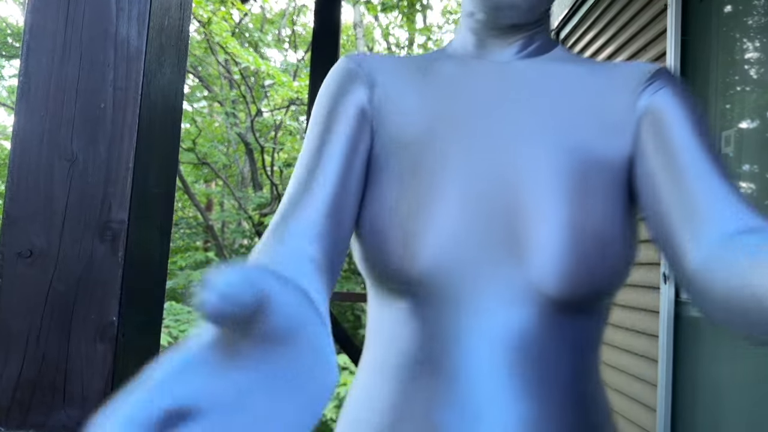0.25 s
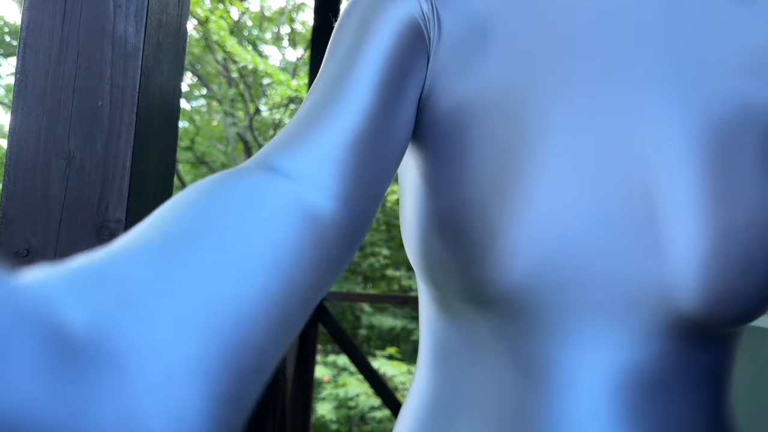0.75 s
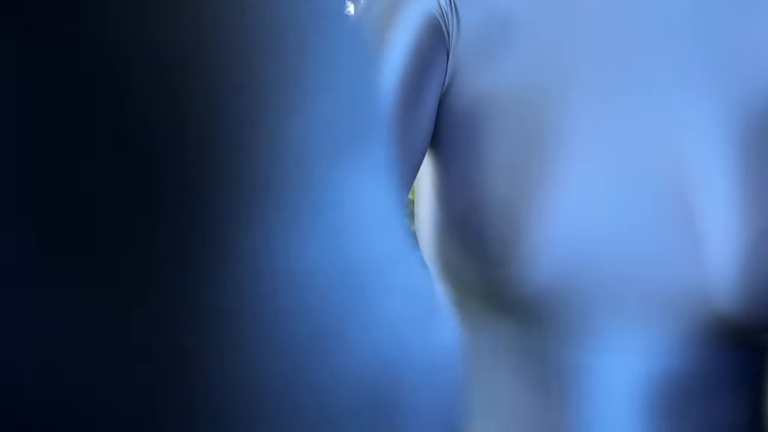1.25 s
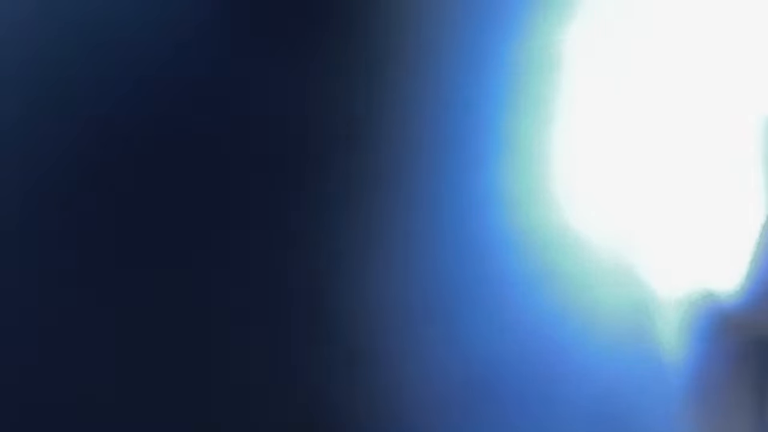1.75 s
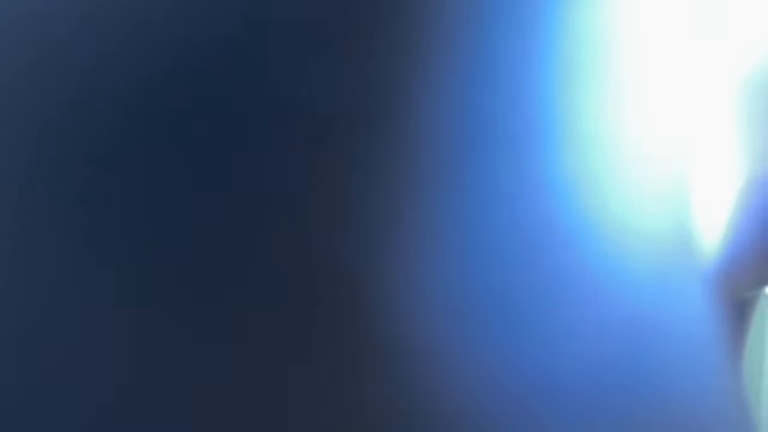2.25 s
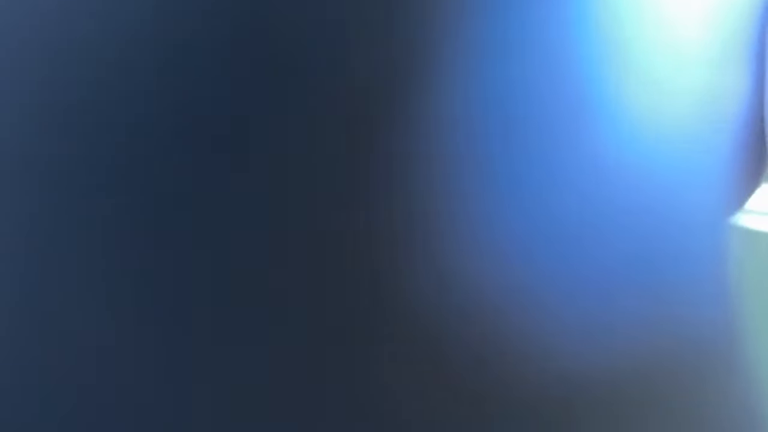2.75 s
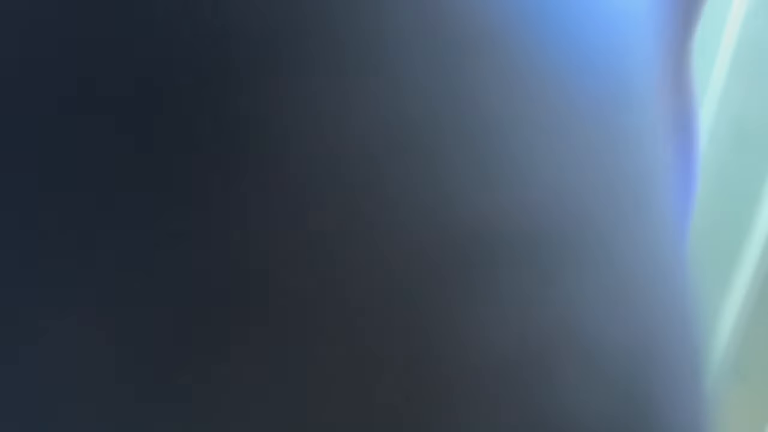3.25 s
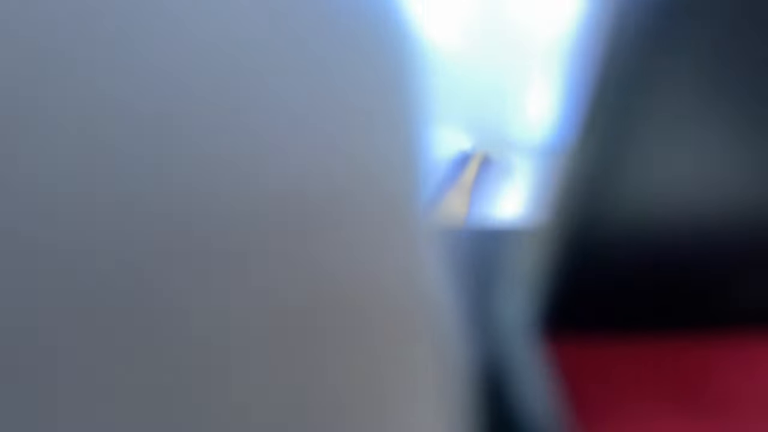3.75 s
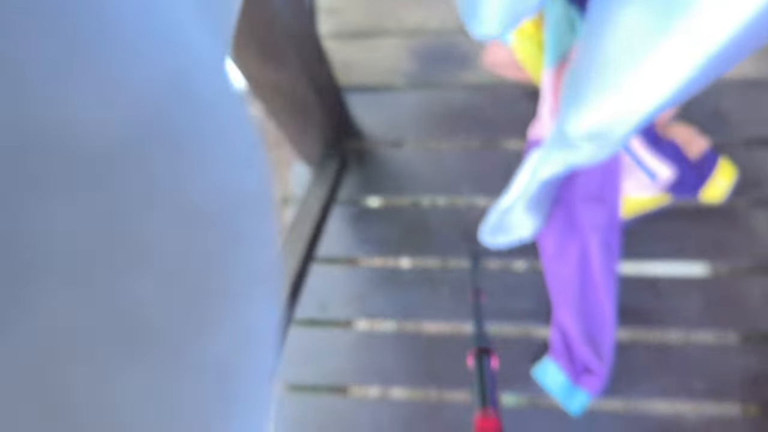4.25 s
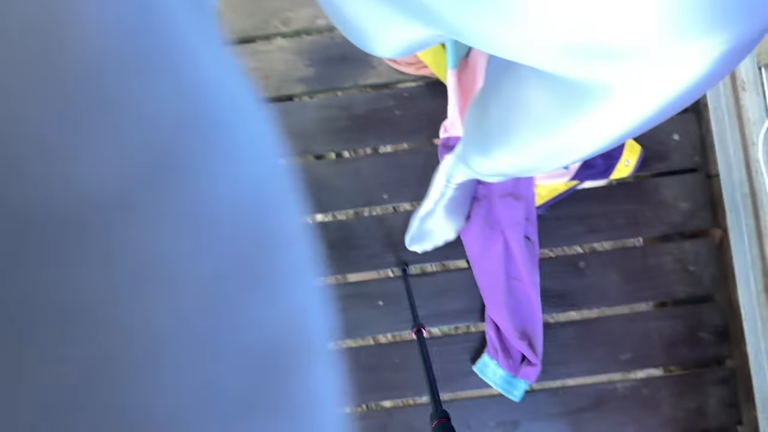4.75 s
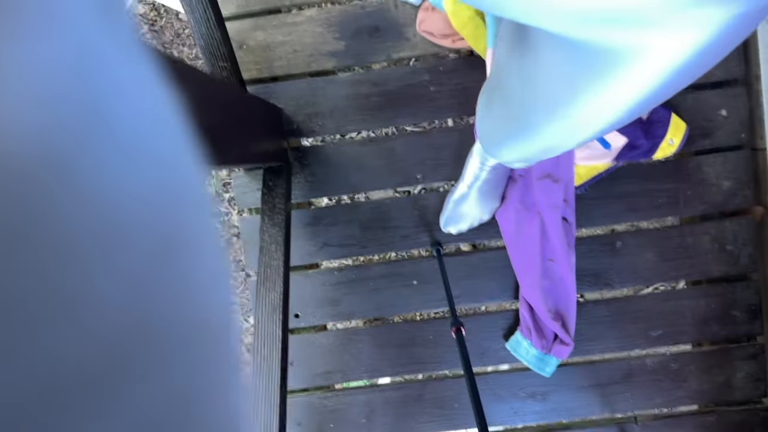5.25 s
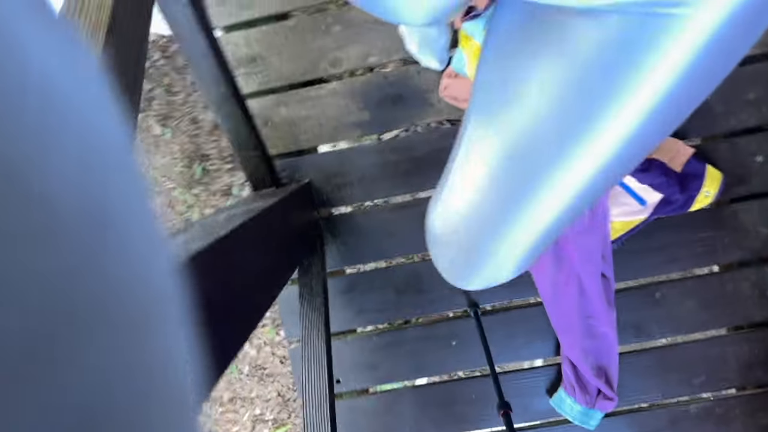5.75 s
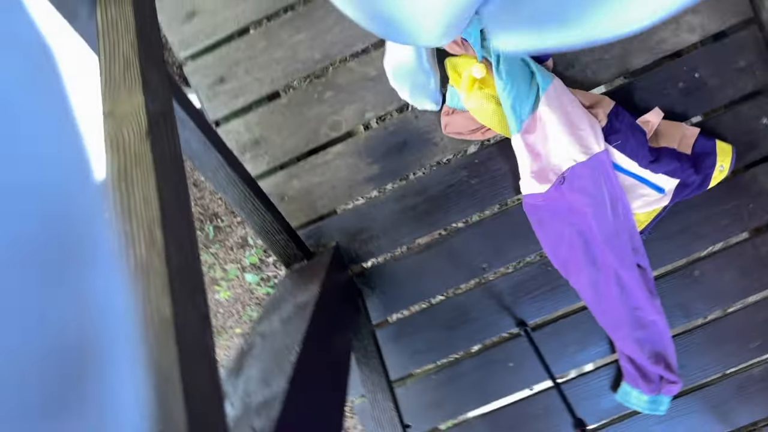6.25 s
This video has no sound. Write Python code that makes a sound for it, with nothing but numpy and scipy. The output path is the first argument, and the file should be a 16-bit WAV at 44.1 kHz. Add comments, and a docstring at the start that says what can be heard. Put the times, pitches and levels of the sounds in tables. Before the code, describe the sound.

A handled camera clicks, bumps and squeaks out of a plastic mount, with soft fabric swishes and faint, repeated rising bird whistles outdoors.

```python
"""A hand works a camera out of its plastic holder: the casing clicks and thumps, then scrapes and
squeaks free. Contacts and tiny slips ring its body, shell and edges; stick and slip makes the squeals.
Stretch-fabric sleeves swish near the microphone. Around the wooden forest balcony a bird repeats a
rising whistle among the trees and others pipe faintly, over a steady outdoor hiss."""
import sys
import numpy as np
from scipy import signal
from scipy.fft import rfft, irfft, next_fast_len
from scipy.io import wavfile
from scipy.ndimage import map_coordinates

SR = 44100
rng = np.random.default_rng(int(sys.argv[2]) if len(sys.argv) > 2 else 0)


def inscribe(sig):
    """Save sig as 16-bit PCM at rate SR to the path in sys.argv[1].

    A 1-D sig is mono; a 2-D sig holds one channel per row.
    Samples are clipped to [-1, 1] before scaling.
    """
    pcm = np.round(np.clip(np.atleast_2d(sig).T, -1, 1) * 32767)
    wavfile.write(sys.argv[1], SR, pcm.astype(np.int16))


N = 286650  # 6.5 s


def amp(db):
    """Decibels to gain."""
    return 10 ** (np.asarray(db) / 20)


def unit(x):
    """Scale to rms 1."""
    return x / np.sqrt(np.mean(x ** 2) + 1e-20)


def along(points, hz):
    """Read (Hz, value) points on a log frequency axis."""
    point_hz, values = np.transpose(points)
    return np.interp(np.log(hz + 1), np.log(point_hz + 1), values)


def curve(points):
    """An automation line through (seconds, value) points."""
    times, values = np.transpose(points)
    return np.interp(np.arange(N) / SR, times, values)


def clock(length):
    """Sample times over a length in seconds."""
    return np.arange(max(int(length * SR), 2)) / SR


def add(track, start, sound):
    """Mix a sound into a track at a start time in seconds."""
    part = track[max(round(start * SR), 0):][:len(sound)]
    part += sound[:len(part)]


def wobble(rate):
    """A smooth random curve, rate knots a second."""
    return map_coordinates(rng.standard_normal(int(N * rate / SR) + 4), [np.arange(N) * rate / SR])


def gate(start, end, edge):
    """Open between start and end, with soft fades of edge seconds."""
    t = np.arange(N) / SR
    inside_s = np.minimum(t - start, end - t)
    return np.sin(np.pi / 2 * np.clip(inside_s / edge + .5, 0, 1)) ** 2


def swell(start, end, steep, build_db=0):
    """A stroke gathers speed and slows again: an arch that may lean towards its end."""
    from_middle = np.arange(N) / SR - (start + end) / 2
    position = np.clip(from_middle / max(end - start, .002), -5, 5)
    return np.exp(-np.abs(2 * position) ** steep) * amp(build_db * position)


def strokes(rows, steep):
    """Joint envelope of (start, end, dB) strokes, summed in power."""
    return np.sqrt(sum((amp(db) * swell(start, end, steep)) ** 2 for start, end, db in rows))


def filtered(x, response):
    """Filter x by a complex response of frequency."""
    size = next_fast_len(len(x) + 8192)
    return irfft(rfft(x, size) * response(np.fft.rfftfreq(size, 1 / SR)), size)[:len(x)]


def resonate(x, modes):
    """Ring a bank of (Hz, width, dB) resonances of alternating polarity."""
    def response(f):
        return sum((-1) ** k * amp(db) * 1j * f * width / (hz * hz - f * f + 1j * f * width)
                   for k, (hz, width, db) in enumerate(modes))
    return filtered(x, response)


def noise(spectrum):
    """Noise of rms 1, coloured by (Hz, dB) points."""
    return unit(filtered(rng.standard_normal(N), lambda hz: amp(along(spectrum, hz))))


def tone(hz):
    """A sine of rms 1 that follows a pitch curve."""
    return np.sqrt(2) * np.sin(2 * np.pi * np.cumsum(hz) / SR)


# Colour of the outdoor bed. Each row: frequency in Hz, relative level in dB.
AIR_COLOUR = [(15, -61), (25, -36), (45, 0.5), (70, -2), (170, -8), (206, -3.5), (242, -7.5), (516, -8.5),
              (560, -8.5), (1330, -9), (2000, -16.5), (2160, -11.5), (3340, -21), (5280, -27),
              (16000, -43.5)]
# The bed's fader, in an early and a late list. Each row: time in seconds, level in dB.
AIR_FADER = [
    [(0.0, -58), (1.88, -57), (2.6, -57)],
    [(3.9, -58), (4.37, -58.5), (6.5, -56.5)],
]
# Two humps in the hiss. Each row: centre in Hz, width in Hz, gain in dB.
AIR_HUMPS = [(1130, 310, -3.5), (2050, 330, -2.5)]
# The hollow under the hand. Each row: centre in Hz, width in Hz, gain in dB.
CUP_MODES = [(1300, 240, -1.5), (2180, 140, -3)]


def air(cup_db=-5):
    """The forest hush wavers slightly, and turns hollow while the hand is cupped over the camera."""
    level = amp(curve(np.vstack(AIR_FADER)) + 0.6 * wobble(6.7))
    humps = unit(resonate(rng.standard_normal(N), AIR_HUMPS))
    cupped = gate(1.09, 3.88, edge=0.39) * unit(resonate(rng.standard_normal(N), CUP_MODES))
    hiss = amp(0.57) * noise(AIR_COLOUR)
    return level * (hiss + amp(-6.5 + wobble(1.1)) * humps + amp(cup_db) * cupped)


# The forest's reverb tail. Each row: frequency in Hz, seconds to fade by 60 dB.
FOREST_DECAY = [(1000, 0.67), (4000, 1), (10000, 0.89)]


def forest(x, direct_db, wet_db, near_db, near_t60=.16):
    """Near trunks and walls blur a sound at once; farther trees add a diffuse tail."""
    hz, t, spectrum = signal.stft(rng.standard_normal(SR), SR, nperseg=256)
    far = amp(-60 * t / along(FOREST_DECAY, hz)[:, None])
    near = amp(near_db - 60 * t / near_t60)
    tail = signal.istft(spectrum * (far + near), SR, nperseg=256)[1]
    wet = signal.fftconvolve(x, tail / np.linalg.norm(tail))[:N]
    return amp(direct_db) * x + amp(wet_db) * wet


# Sheen of the birds' octave. Each row: the octave's frequency in Hz, relative level in dB.
OCTAVE_COLOUR = [(6500, -15), (7800, -7.5), (9000, -29), (10500, -26.5)]


def chirp(hz, waver, overtone_db):
    """A slightly unsteady whistle with a weak octave."""
    hz = hz * (1 + waver * wobble(220)[:len(hz)])
    return tone(hz) + amp(overtone_db + along(OCTAVE_COLOUR, 2 * hz)) * tone(2 * hz)


# A second bird's short pipes. Each row: start in seconds, relative level in dB, top pitch in Hz.
PIPE_NOTES = [(.05, -63, 2900), (.383, -55, 3494), (.94, -61, 3520), (3.9, -65, 2950), (4.18, -67.5, 3480),
              (4.76, -63, 3430)]


def piping_bird():
    """Short, clean pipes that arch in pitch and level."""
    out, t = np.zeros(N), clock(0.05)
    progress = t / t[-1]
    arch = np.sin(np.pi * progress)
    bend = 1 - 0.15 * (progress - .75) ** 2
    for start, db, top_hz in PIPE_NOTES:
        add(out, start, amp(db) * arch * chirp(top_hz * bend, waver=0.012, overtone_db=-9))
    return out


def thin_bird(start=4.155, end=4.52, first_hz=13000, last_hz=9000, db=-78, fade_db=10):
    """One very thin whistle that falls ever faster and fades."""
    out = np.zeros(N)
    progress = clock(end - start) / (end - start)
    glide_hz = first_hz + (last_hz - first_hz) * progress ** 1.3
    waver = (1 + .015 * wobble(30) + .006 * wobble(150))[:len(progress)]
    envelope = amp(db - fade_db * progress) * signal.windows.tukey(len(progress), .1)
    add(out, start, envelope * tone(glide_hz * waver))
    return out


# The near bird's whistles. Each row: start in seconds, relative level in dB, top pitch in Hz.
RISING_CALLS = [(1.271, -63.5, 5430), (1.565, -67, 5260), (1.843, -66, 5420), (2.145, -64.5, 5270),
                (2.43, -63, 5370), (4.982, -57.5, 4830), (5.272, -56.5, 5380), (5.532, -56.5, 5370),
                (5.825, -56, 5420), (6.081, -54.5, 5400), (6.38, -53, 5430)]


def near_bird(rise_hz=1123, rise_s=.07, hook_hz=1403, hook_s=.028, attack_s=0.0094, hook_fade_db=12):
    """Each call swells in and slides upward, then hooks quickly down as it fades."""
    out, t = np.zeros(N), clock(rise_s + hook_s)
    climb = np.minimum(t / rise_s, 1)
    hook = np.maximum(t - rise_s, 0) / hook_s
    under_top_hz = rise_hz * (1 - climb) + hook_hz * hook ** 1.3
    envelope = (1 - np.exp(-t / attack_s)) * amp(-hook_fade_db * hook)
    for start, db, top_hz in RISING_CALLS:
        add(out, start, amp(db) * envelope * chirp(top_hz - under_top_hz, waver=.009, overtone_db=1))
    return out


# Sleeve moves. Each row: start and end in seconds, relative level in dB.
SLEEVE_SWISHES = [(0, 0.213, -70), (0.526, 0.67, -62), (0.863, 1.093, -69), (1.117, 1.36, -63),
                  (1.355, 1.56, -67.5), (3.582, 3.719, -66), (3.93, 3.984, -68.5), (4.08, 4.14, -66),
                  (4.199, 4.56, -73.5), (4.57, 4.836, -68.5), (5.517, 5.609, -64.5), (5.92, 6.054, -62.5),
                  (6.05, 6.4, -72)]
# Colour of the cloth. Each row: frequency in Hz, relative level in dB.
FABRIC_COLOUR = [(1500, -13.5), (4000, 4), (6500, 2), (10000, -0.5), (14000, 2), (16000, -3.5)]


def sleeves():
    """Smooth fabric slides on fabric in soft, bright swishes that swell unevenly."""
    return strokes(SLEEVE_SWISHES, steep=3) * noise(FABRIC_COLOUR) * amp(1.04 * wobble(35) + 2.5)


# Finger pressure. Each row: start and end in seconds, level in dB.
FINGER_PRESSES = [(.95, 1.5, -62), (1.65, 2.35, -55.5), (2.87, 3.03, -35.5), (3.03, 3.54, -46),
                  (4.57, 4.7, -56)]
# Colour of the handling rumble. Each row: frequency in Hz, relative level in dB.
RUMBLE_COLOUR = [(20, -32.5), (32, -16.5), (48, -3.5), (80, 0.5), (130, -6), (220, -13), (500, -40),
                 (1500, -73.5)]


def grip(hold_db=-69.5):
    """A holding hand keeps up a faint, lumpy rumble that grows as the fingers press and shift."""
    level = np.hypot(amp(hold_db), strokes(FINGER_PRESSES, steep=2.3))
    return level * unit(noise(RUMBLE_COLOUR) * amp(3.8 * wobble(11)))


# Soft, low pushes. Each row: start in seconds, relative level in dB, pitch in Hz.
PUSHES = [(0.933, -35, 64.5), (1.225, -45, 55.4), (1.545, -37, 65.4), (1.683, -44, 240), (2.01, -42.5, 215),
          (2.882, -29, 165), (2.894, -28.5, 82.3), (2.941, -22.5, 116.5), (2.963, -26, 62),
          (3.113, -31.5, 90.5), (3.499, -27.5, 62), (3.541, -34.5, 55), (3.677, -38.5, 220)]


def thumps(cycles=7, attack_s=0.00096):
    """A push rocks the camera; the swing dies by 60 dB over a few cycles."""
    out, t = np.zeros(N), clock(.3)
    onset = 1 - np.exp(-t / attack_s)
    for start, db, hz in PUSHES:
        envelope = onset * amp(db + 3.5 - 60 * hz * t / cycles)
        add(out, start, envelope * np.sin(2 * np.pi * hz * t))
    return out


# Plastic squeals. Each row: start and end in seconds, pitch in Hz, relative level in dB,
# octave over the fundamental in dB, depth of pitch jitter.
SQUEALS = [(2.936, 2.943, 9000, -11, -48, 0.0044), (2.986, 3.003, 5220, -35, -13, .03),
           (2.996, 3.011, 4370, -38, 9.5, 0.025), (3.013, 3.031, 4000, -31.5, 0.5, .03),
           (3.095, 3.107, 4970, -39.5, -1, 0.028), (3.157, 3.204, 5540, -25.5, -7, 0.039)]


def squeaks(sag_share=.015, flutter_db=4, third_db=-10):
    """Stick and slip falls into step: a brief, rough tone with two overtones sags as the slip slows."""
    out = np.zeros(N)
    waver = 1.5 * wobble(2200) + .4 * wobble(170)
    for start, end, centre_hz, db, octave_db, jitter in SQUEALS:
        sag = curve([(start, sag_share / 2), (end, -sag_share / 2)])
        hz = centre_hz * (1 + sag + jitter * waver)
        overtones = tone(2 * hz) + amp(third_db) * tone(3 * hz)
        out += gate(start, end, edge=0.0027) * amp(db) * (tone(hz) + amp(octave_db) * overtones)
    return out * amp(flutter_db * np.tanh(wobble(300)) - 4.5)


# The camera's three voices: the heavy body's knock, the plastic shell's clack, the stiff edges' crack.
# Each row: resonance in Hz, width in Hz, gain in dB.
BODY_MODES = [(150, 12, -14.5), (284, 25, -5), (358, 45, -5.5), (430, 57, -4), (565, 140, -13.5),
              (1022.5, 120, -8)]
SHELL_MODES = [(480, 236, -17.5), (815, 300, -10.5), (1111, 240, -7.5), (1430, 170, 1.5), (1845, 260, -0.5),
               (2110, 370, 0.5), (2740, 810, -3), (3330, 570, -3.5), (3850, 110, -5.5)]
EDGE_MODES = [(4460, 930, -2), (5550, 480, 0), (6440, 740, -4), (8480, 360, -3), (9200, 700, -5),
              (10470, 590, 0), (12300, 1200, -6.5), (14800, 830, -7.5)]


def struck_at(modes, centre_hz, falloff_db, reach_octaves=1.3):
    """The contact spot favours modes near one pitch; the others lose falloff_db per octave, to a limit."""
    return [(hz, width, db - falloff_db * min(abs(np.log2(hz / centre_hz)), reach_octaves))
            for hz, width, db in modes]


def friction(modes, slips_per_s, smooth_share, uneven_db):
    """Tiny random slips over a smooth hiss excite the modes; rms 1."""
    slips = (rng.random(N) < slips_per_s / SR) * rng.standard_normal(N)
    force = (unit(slips) + smooth_share * rng.standard_normal(N)) * amp(uneven_db * wobble(220))
    return unit(resonate(force, modes))


# The hand dragging on the casing. Each row: start and end in seconds, level in dB.
HAND_DRAGS = [(2.85, 2.93, -47.5), (2.94, 3.01, -43.5), (3.09, 3.52, -49), (3.14, 3.23, -37),
              (3.29, 3.38, -40.5), (3.455, 3.5, -42.5), (3.5, 3.7, -66)]
# The holder slipping along the casing. Each row: start and end in seconds, shell level in dB,
# weight (body over shell) in dB, hardness (edge hiss over shell) in dB.
HOLDER_SCRAPES = [(2.931, 2.96, -24.5, -9, 2.5), (2.985, 3.03, -39.5, -23, -0.5),
                  (3.169, 3.206, -31, -20, -1), (3.3, 3.373, -49.5, 6, -3),
                  (3.474, 3.491, -35.5, -6.5, -22)]


def rubbing(drag_body_db=-7, drag_hiss_db=-8, pressure_build_db=2.5):
    """The hand drags smoothly over the casing while the holder lets go in short, grainy scrapes."""
    drag = strokes(HAND_DRAGS, steep=1.8)
    body, shell, hiss = drag * amp(drag_body_db), np.zeros(N), drag * amp(drag_hiss_db)
    for start, end, db, weight_db, hard_db in HOLDER_SCRAPES:
        stroke = amp(db) * swell(start, end, steep=4, build_db=pressure_build_db)
        body = np.hypot(body, stroke * amp(weight_db))
        shell = np.hypot(shell, stroke)
        hiss = np.hypot(hiss, stroke * amp(hard_db))
    broad_modes = struck_at(SHELL_MODES, centre_hz=1650, falloff_db=4.0)
    low_modes = struck_at(BODY_MODES, centre_hz=308.2, falloff_db=7.5)
    # the holder bears on one spot, so its scrapes sound hollow
    hollow_modes = struck_at(SHELL_MODES, centre_hz=1540, falloff_db=6.0)
    return (drag * friction(broad_modes, slips_per_s=3000, smooth_share=.9, uneven_db=0.0)
            + body * friction(low_modes, slips_per_s=230, smooth_share=.6, uneven_db=2.5)
            + shell * friction(hollow_modes, slips_per_s=700, smooth_share=.5, uneven_db=2.5)
            + hiss * friction(EDGE_MODES, slips_per_s=2200, smooth_share=.7, uneven_db=-0.8))


def strike(modes, contact_t60, rattle_db, rattle_t60):
    """A short contact and a weak, longer rattle ring the modes; the energy equals 10 ms at rms 1."""
    t = clock(.15)
    envelope = amp(-60 * t / contact_t60) + amp(rattle_db - 60 * t / rattle_t60)
    ring = resonate(rng.standard_normal(len(t)) * envelope, modes)
    return ring / np.linalg.norm(ring) * np.sqrt(SR / 100)


# Hard hits on the casing. Each row: start in seconds, clack level over 10 ms in dB,
# weight (knock over clack) in dB, hardness (crack over clack) in dB.
CASING_HITS = [(0.183, -62, -10, 2.5), (0.9216, -42, 2, -0.5), (0.925, -32, 6.5, 11),
               (1.5297, -31.5, -8, 0.5), (1.539, -42, -3, -1.5), (1.632, -51.5, 5, -16),
               (1.681, -57, 10, -18), (1.7463, -40.5, -3.5, -15.5), (1.8162, -29, -21, -0.5),
               (2.054, -51.5, -2, -22), (2.2, -44.5, -1, -8), (2.267, -44.5, -2.5, -10.5),
               (2.3445, -43.5, -5, -16), (2.4677, -45.5, -10, -30), (2.7075, -30, -22.5, -21),
               (2.714, -41.5, -16, 6), (2.861, -34, -17, -13), (2.8805, -41, -2.5, -15),
               (2.917, -34, -14, -25), (3.068, -39, -5, -9), (3.0788, -37.5, -24, -22),
               (3.117, -37.5, -20, -11), (3.4855, -38.5, -2, -17), (3.676, -62.5, 5, -3)]


def knocks(clack_hz=1915, clack_at_db=-38.5, clack_oct_per_db=.017, crack_hz=6900, crack_oct_per_db=0.3):
    """Each contact rings the heavy body, the plastic shell and its stiff edges."""
    out = np.zeros(N)
    for start, db, weight_db, hard_db in CASING_HITS:
        shell_hz = clack_hz * 2 ** (clack_oct_per_db * (db - clack_at_db))  # stronger hits clack higher
        edge_hz = crack_hz * 2 ** (-crack_oct_per_db * weight_db)  # heavier hits crack lower
        shell = struck_at(SHELL_MODES, shell_hz, falloff_db=10.5)
        edge = struck_at(EDGE_MODES, edge_hz, falloff_db=2.5)
        knock = strike(BODY_MODES, contact_t60=0.006, rattle_db=-23.5, rattle_t60=0.072)
        clack = strike(shell, contact_t60=0.021, rattle_db=-19, rattle_t60=0.079)
        crack = strike(edge, contact_t60=0.015, rattle_db=-21.0, rattle_t60=.045)
        add(out, start, amp(db) * (amp(weight_db) * knock + clack + amp(hard_db) * crack))
    return out


def scene():
    """Handling sounds reach the microphone dry; the birds come through the trees."""
    handling = knocks() + thumps() + grip() + rubbing() + squeaks() + sleeves()
    calls = forest(near_bird(), direct_db=-8.5, wet_db=-1, near_db=-1.5)
    other_birds = forest(piping_bird() + thin_bird(), direct_db=-3.0, wet_db=3, near_db=7.5)
    return (handling + calls + other_birds + air())[None]


def record(dry, low_cut_hz=32, top_hz=16000):
    """The microphone sheds the deepest rumble and cuts off steeply at the top of its band."""
    low_cut = signal.butter(3, low_cut_hz, "highpass", fs=SR, output="sos")
    return np.array([filtered(channel, lambda hz: 1 / np.sqrt(1 + (hz / top_hz) ** 160))
                     for channel in signal.sosfilt(low_cut, dry)])


dry = scene()
out = record(dry)
inscribe(out)
```